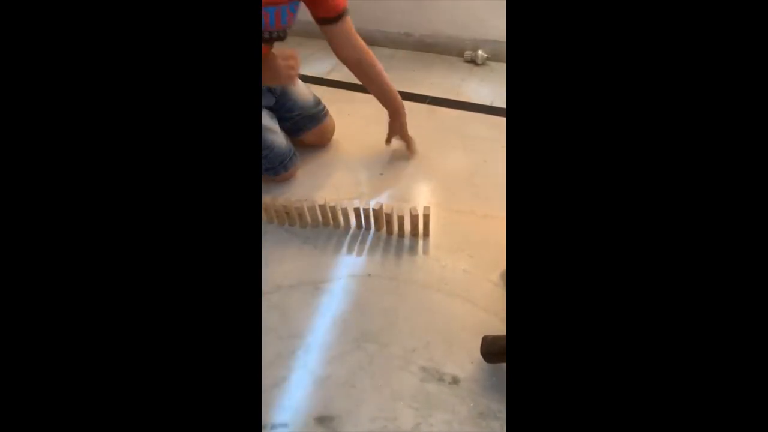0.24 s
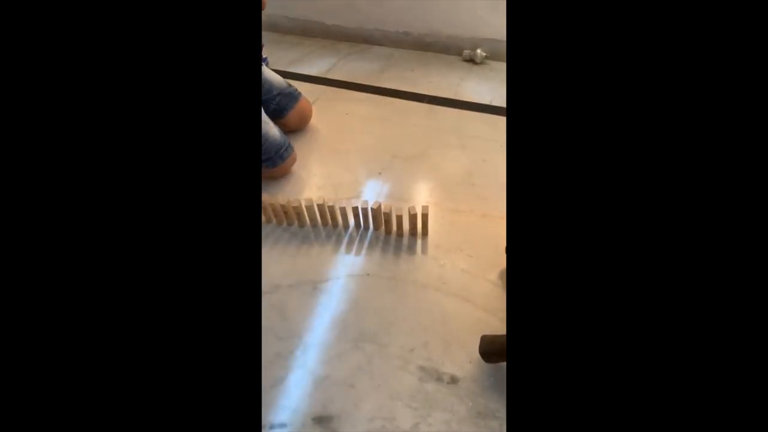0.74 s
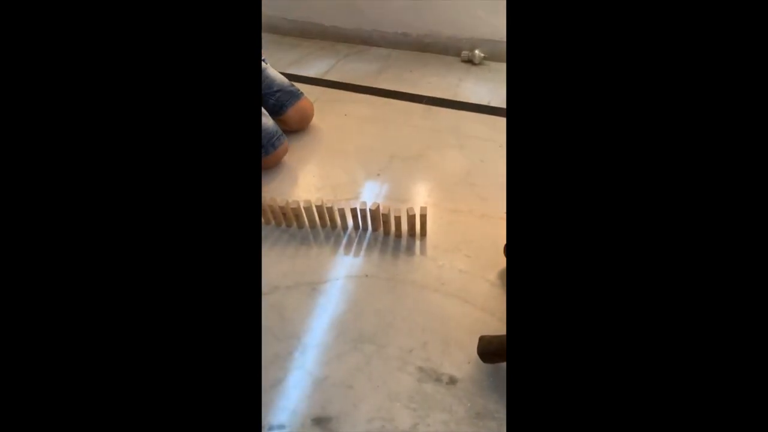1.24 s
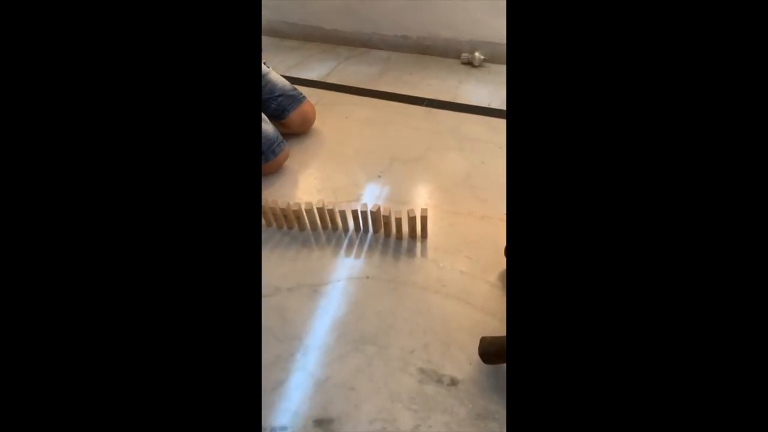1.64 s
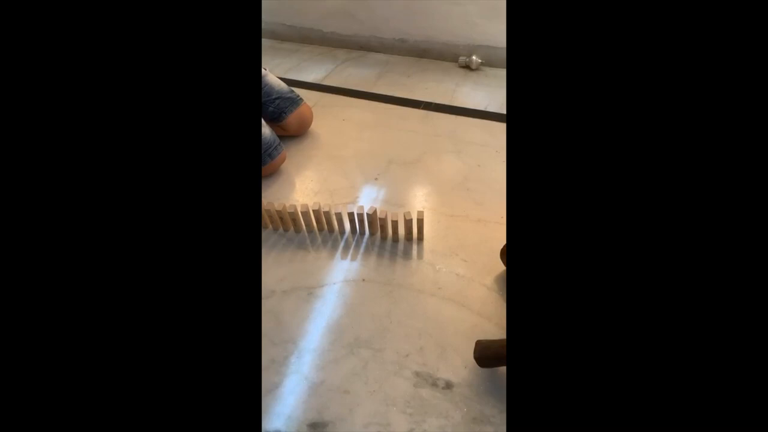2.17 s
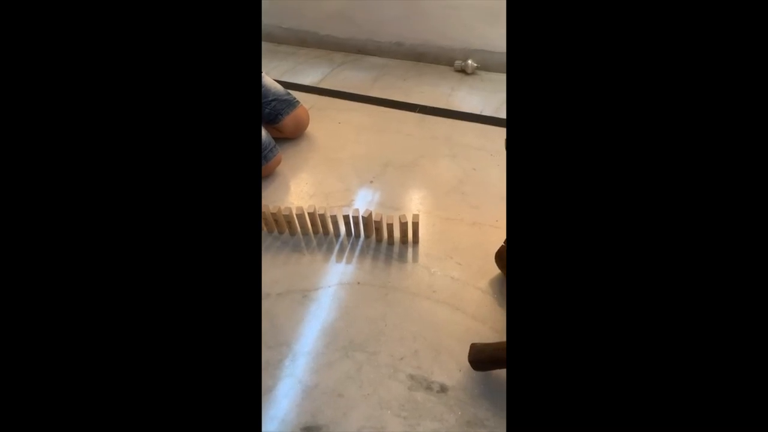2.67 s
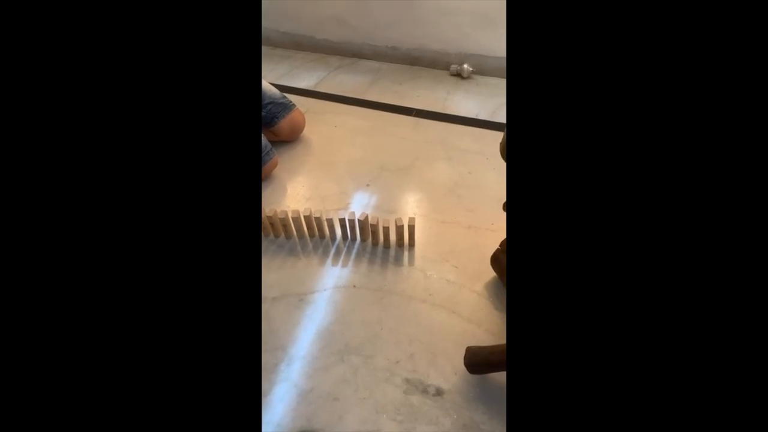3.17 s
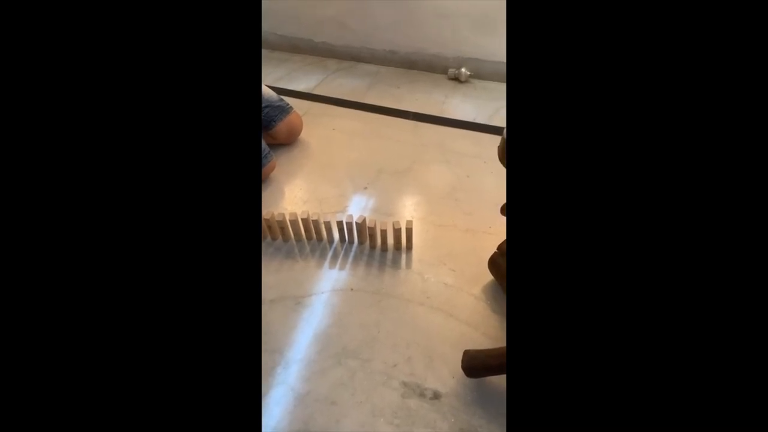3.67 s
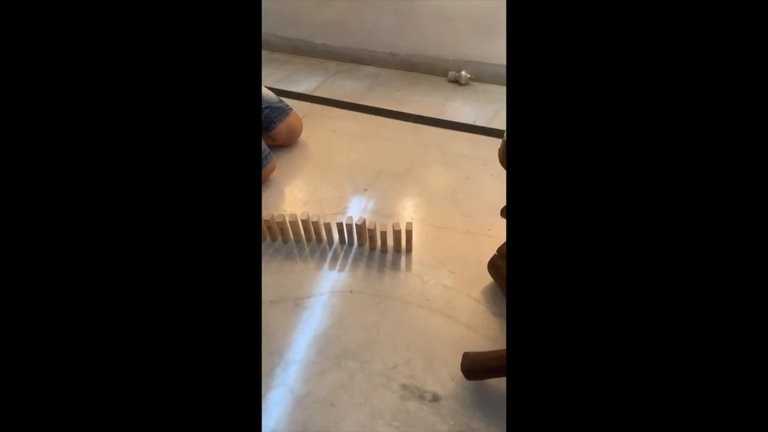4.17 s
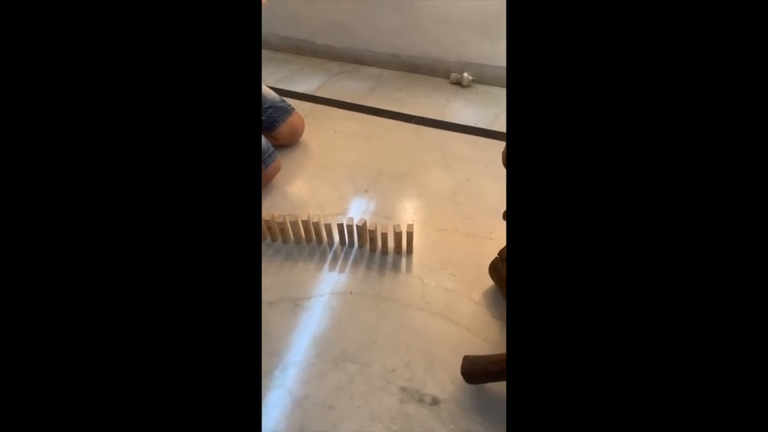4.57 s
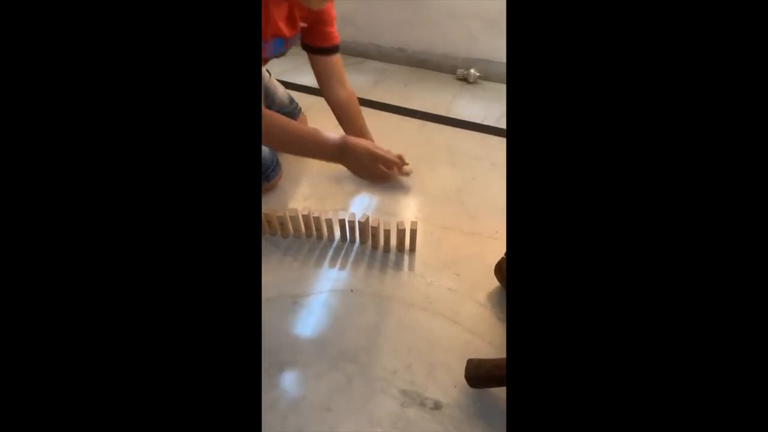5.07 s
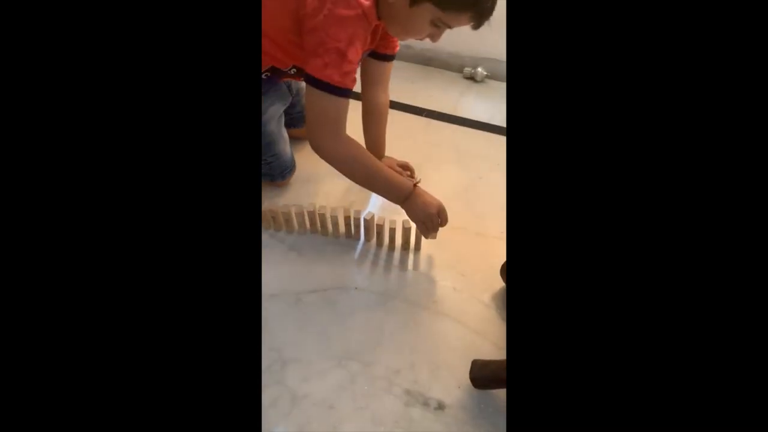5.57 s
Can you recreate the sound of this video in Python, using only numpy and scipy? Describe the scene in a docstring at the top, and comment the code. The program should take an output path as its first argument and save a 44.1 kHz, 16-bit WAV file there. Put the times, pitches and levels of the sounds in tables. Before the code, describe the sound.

Wooden blocks rummaged and knocked about in a hollow wooden box in a bare, ringing room, then one sharp block click nearby.

```python
"""Wooden blocks in a box

Wooden blocks tumble and knock in a hollow wooden box on a stone floor in a bare, ringing room.
Knocks and clicks are decaying sine waves plus noise bursts; lighter contacts form a random rattle.
Knees thump the floor as low sine pulses; slides, cloth and room tone are shaped noise.
Two microphone ports a few centimetres apart hear the hits from one side."""
import sys
import numpy as np
from scipy import signal
from scipy.fft import rfft, irfft, next_fast_len
from scipy.io import wavfile
from scipy.ndimage import uniform_filter1d

SR = 44100
rng = np.random.default_rng(int(sys.argv[2]) if len(sys.argv) > 2 else 0)


def unload_wav(signal):
    """Save mono or channel-first audio to the path in sys.argv[1] as 16-bit WAV at rate SR, clipped to [-1, 1]."""
    wavfile.write(
        sys.argv[1],
        SR,
        np.round(np.clip(np.atleast_2d(signal).T, -1, 1) * 32767).astype(np.int16),
    )


N = 256695

# Knocks in the box: t/s, side panels level/dB, then against the side panels: hollow level/dB,
# low panels level/dB, block bodies level/dB, crack level/dB; favoured side panel f/Hz, favoured block f/Hz
KNOCKS = [(0.803, -48.5, 7.5, 7, -6, 2.5, 870, 1120), (0.815, -47, -2, 8.5, -16, -3.5, 940, 1140),
          (0.843, -61, 15, 5, 2, -17, 767, 1980), (0.869, -33.5, -6.5, 4.5, 0.5, -7, 680, 1784),
          (0.9, -43.5, 3, -5, -22, -33, 556, 1760), (1.035, -46, -0.5, -8, -5, -3, 590, 1580),
          (1.118, -50.5, -16, -10, -18, -30, 724, 1570), (1.196, -53.5, 2, -12, -5, -22, 680, 984),
          (1.247, -60.5, 4.5, -8, -3, 5, 760, 2230), (1.545, -55.5, 2, -15, -6, -3.5, 825, 1940),
          (1.696, -47.5, -1, 2, -23, -15, 855, 1580), (1.725, -40, -17, -7, 4.5, -7, 660, 1610),
          (1.733, -29, -2.5, -3.5, -9, -16, 746, 1250), (1.761, -32.5, -11.5, -16, -2, -18, 790, 1570),
          (1.848, -31.5, -25, -16, 2, -15, 760, 1385), (1.908, -47, -15, 1, -5, -37, 695, 1690),
          (1.931, -31, -10, -6, -5, -21, 860, 1080), (1.963, -25, -12, -7, -0.5, -7.5, 675, 1273),
          (2.012, -21.5, -14.5, -4.5, -14, -12, 750, 1320), (2.035, -24, -7, 2.5, -6.5, -10.5, 596, 1630),
          (2.06, -37.5, -27, -5, -10, -9, 766, 1250), (2.093, -22.5, -24.5, -12.5, -7.5, -16, 860, 1050),
          (2.141, -44, 5.5, 11, -12, -9.5, 778, 1340), (2.197, -30, -3, -3, 4.5, -2.5, 494, 1290),
          (2.208, -23.5, -9, -1, -2, -5.5, 767, 1310), (2.265, -34, -23, -16.5, 8.5, -28, 764, 1520),
          (2.357, -29, -9.5, -10.5, -7.5, -13.5, 674, 1310), (2.363, -29.5, -9.5, -0.5, 0.5, -4, 770, 1640),
          (2.404, -30, -19, -7, -19.5, -8, 765, 1793), (2.413, -26, -22, -10, 1, 2.5, 737, 1080),
          (2.432, -29, -5.5, 4, 9, -11, 780, 1580), (2.445, -32.5, 6.5, 3, -11, -7, 790, 1550),
          (2.497, -30, -5.5, 5.5, -10.5, -13, 740, 1580), (2.546, -36.5, -0.5, 6.5, -6, -26.5, 794, 1550),
          (2.67, -35, 2.5, 3, -3, -5.5, 670, 1030), (2.737, -37.5, -1.5, 3.5, -6.5, -13.5, 516, 1370),
          (2.753, -31, 0, -2, 4, -9, 840, 1525), (2.809, -49, -7, -6, -7.5, -27.5, 600, 1650),
          (2.899, -31.5, -9, -3.5, -5, -6, 640, 1080), (2.984, -30.5, 0, -4.5, -8, -10, 770, 1530),
          (3.0069, -9.5, -2, 1.5, -2.5, -10, 703, 1364), (3.03, -20.5, -4, -1, -1.5, -15.5, 806, 1560),
          (3.058, -28.5, 3.5, 6, -0.5, -12, 790, 1280), (3.109, -24.5, -2, 1, 0.5, -20, 617, 1210),
          (3.133, -26.5, -6.5, 1.5, -3, -16.5, 477, 1300), (3.168, -29.5, 0.5, -3, 4, -9, 550, 1270),
          (3.371, -54, -9.5, -16.5, 13, 3, 800, 1680), (3.416, -43.5, -1.5, 1, -11.5, -7, 790, 1300),
          (3.446, -47, -6, -7.5, -11.5, -23, 634, 1530), (3.554, -42, -4, 1.5, -13.5, -21.5, 595, 1310),
          (3.578, -47, -1.5, 1, -7, -12, 630, 1630), (3.636, -34, -14.5, 0, 3, -9, 660, 2160),
          (3.651, -12.5, -5, 1, -3, -6, 603, 1390), (3.677, -24, -3.5, 0, -6.5, -17, 706, 1980),
          (3.697, -26.5, -6, -6.5, 3, -13.5, 656, 1583), (3.73, -24, -21.5, -18.5, -26, -26.5, 676, 1670),
          (3.792, -33.5, -9.5, -1, 5, -9, 695, 1310), (3.85, -47, -6, -0.5, 7.5, -1, 590, 1110),
          (3.909, -45.5, 2.5, 0, 1, -9, 628, 1287), (5.398, -60, -6, -2.5, -6, -12, 560, 1100)]
# What rings in the box, each: f/Hz, level/dB, time to fall 60 dB t60/s
HOLLOW_AIR = [(197.2, -23, 0.037), (230, -13, 0.13), (244, -9.5, 0.28), (263.5, -10.5, 0.3),
              (260, -5, 0.036)]
LOW_PANELS = [(338, -3, 0.031), (384.5, 7, 0.025), (420, -6.5, 0.02), (480, -3.5, 0.0065)]
SIDE_PANELS = [(562, -10.5, 0.05), (639, -15, 0.08), (635, 13, 0.014), (778.6, 0.5, 0.041),
               (849.3, 2.5, 0.033), (942, 3, 0.025)]
BLOCK_BODIES = [(1039, -5.5, 0.04), (1199, -1.5, 0.027), (1295, -2, 0.025), (1490, 2, 0.011),
                (1580, -1, 0.03), (1729, 0, 0.025), (2026, 7.5, 0.017), (2286, -10.5, 0.03),
                (2530, -8.5, 0.019), (3237, 3.5, 0.0095)]
# The struck piece rings at its own pitch, each: level/dB, t60/s
OWN_PANEL = (9.2, 0.012)
OWN_BLOCK = (6, 0.024)
# Colour of a knock's crack, and of sharp edges and fine hiss, each: f/Hz, level/dB
CRACK_COLOUR = [(1500, -24), (2000, -4.5), (2400, 9), (2900, 5.5), (3200, 5.5), (3500, 0), (4200, -4),
                (5500, -12), (6600, -9), (7200, -42.5)]
EDGE_COLOUR = [(7000, -11.5), (7800, -12.5), (9000, -11.5), (10300, -11), (10800, -7.5), (11100, -36),
               (11600, -52)]
# Small blocks jostle: t/s, level/dB, sharp edge level/dB
RATTLE_LEVELS = [(1.7, -58.5, -59.5), (1.92, -50, -89), (2.02, -38.5, -52.5), (2.19, -45, -59.5),
                 (2.33, -60.5, -104), (2.42, -42.5, -47), (2.6, -47.5, -90), (2.95, -51.5, -66),
                 (3.3, -56.5, -95.5), (3.418, -59.5, -99), (3.53, -87, -110), (3.641, -46.5, -77),
                 (4.0, -64.5, -111)]
# Body colour of a light contact: f/Hz, level/dB
JOSTLE_COLOUR = [(400, -21.5), (600, 7.5), (800, 3.5), (1050, -4), (1400, -3.5), (1900, -2), (2400, -35.5)]
# One block clicks on another: t/s, edge level/dB, then against the edge: body level/dB,
# crack level/dB; t60/s of the edge
CLICKS = [(0.187, -54, -26, 5, 0.057), (0.726, -45.5, -28, -7, 0.46), (0.747, -37.5, -30, -36, 0.088),
          (0.873, -43.5, 7, 12.5, 0.028), (1.173, -57.5, -31, 10, 0.039), (1.191, -49, -9, -6, 0.014),
          (4.382, -49.5, -9.5, -4, 0.015), (5.138, -36.5, 0.5, 9.5, .03), (5.143, -28, 5, 8, .04),
          (5.1496, -10, -7.5, 3, 0.021), (5.154, -18, -5.5, -5.5, 0.01), (5.6189, -65.5, 16, 12, 0.021)]
# Body ring of a click: f/Hz, level/dB, t60/s
CLICK_BODY = [(673, -10.5, 0.03), (1300, 2.5, 0.014), (1510, -7.5, 0.024), (1793, 2, 0.049),
              (1633, -4, 0.03), (2115, 0.5, 0.026), (3204, 2, 0.027)]
# Colour of a click's bright snap and of its crack, each: f/Hz, level/dB
SNAP_COLOUR = [(7000, -33.5), (7900, -1.5), (8800, -2), (9900, 7), (10600, -6.5), (11200, -15),
               (12000, -28.5)]
CLICK_CRACK_COLOUR = [(1500, -27.5), (2200, -0.5), (2600, 2.5), (3100, 1.5), (4000, 5), (4800, 6.5),
                      (6000, 2.5), (6600, -0.5), (7200, -37.5)]
# Rough rings after a click: f/Hz, width f/Hz, level/dB against the click's body, t60/s
AFTER_RINGS = [(1750, 540, -13.0, 0.2), (1676, 260, -28.5, 0.81)]
# Skin or cloth sliding on stone: start t/s, length t/s, level/dB, f/Hz, width f/Hz
SLIDES = [(0.551, 0.28, -62.5, 1150, 400), (0.647, 0.15, -64, 1710, 800), (1.244, 0.14, -65, 2250, 200)]
# Knees and feet shift on the floor, heavy knocks shake it: t/s, level/dB, f/Hz
THUMPS = [(0.195, -57, 102), (0.347, -56, 80), (0.818, -50, 96.5), (0.872, -46.5, 109), (1.107, -55.5, 124),
          (1.332, -51, 64.6), (1.543, -51.5, 58.5), (1.724, -43, 81), (2.002, -45, 116), (2.396, -44, 143),
          (3.006, -69, 132), (3.648, -47.5, 123), (4.155, -68.5, 100.4), (4.653, -44.5, 85.2),
          (4.694, -40.5, 68.6), (4.75, -42.5, 66), (4.799, -53, 76), (4.874, -51.5, 60),
          (4.978, -51.5, 61.7), (5.112, -58.5, 55.5), (5.177, -48.5, 51), (5.222, -59, 58.7),
          (5.548, -56, 66.2)]
# Cloth and skin, before and after the rummaging:
# t/s, low swish level/dB, thin rustle level/dB, fine hiss level/dB
RUSTLE_LEVELS = [
    [(0, -65.5, -74, -70), (.17, -78, -75.5, -78), (.5, -73, -66.5, -80), (.72, -66, -62.5, -68),
     (.9, -50.5, -75, -68), (1.15, -67, -68, -71.5), (1.43, -59.5, -69.5, -82), (1.57, -68, -85, -74),
     (1.72, -56, -57, -63)],
    [(3.95, -59.5, -64, -83), (4.32, -76.5, -74, -84), (4.62, -76, -81.5, -84), (4.78, -67.5, -63, -77),
     (4.98, -95, -63, -71), (5.25, -91.5, -61.5, -67), (5.42, -61, -63, -73), (5.58, -68.5, -75.5, -83.5),
     (5.82, -80.5, -86, -89)],
]
# Colour of the low swish and of the thin rustle, each: f/Hz, level/dB
SWISH_COLOUR = [(400, 2), (800, 4), (1200, -2.5), (2200, -2), (2800, -12.5), (4000, -48)]
CLOTH_COLOUR = [(2200, -5.5), (3000, -3), (3500, 2), (4000, -4), (4600, -20.5), (6300, -18.5),
                (7200, -30.5)]
# Colour of the room tone: f/Hz, level/dB per Hz
TONE_COLOUR = [(12, -44), (20, -18.5), (43, -2), (99, -2), (182, -9.5), (213, -11.5), (570, -20),
               (651, -20.5), (1990, -30.5), (2150, -37.5), (2590, -26.5), (3570, -43), (7130, -52),
               (10100, -39), (11500, -53), (15000, -82), (22000, -120)]
# How fast the room's echoes die: f/Hz, t60/s
ROOM_T60 = [(150, 0.65), (300, 0.28), (800, 0.5), (1200, 0.62), (1650, 0.28), (2200, 0.43), (4000, 0.43),
            (6000, 0.33), (10000, 0.27)]
# Room against direct sound: f/Hz, level/dB
ROOM_LEVEL = [(200, 6.5), (350, -2), (500, -4.5), (900, -4), (1500, 0), (2200, 0.5), (4000, 1), (7000, 2),
              (10400, 0.5), (10900, -35)]
# Likeness of the two ports in scattered sound: f/Hz, likeness from 0 to 1
PORT_LIKENESS = [(30, 0.48), (120, 1), (300, 0.63), (700, 0.12), (2000, 0.025), (5000, 0.45), (7500, 0.75),
                 (9000, 0.21)]
# The small box gives off little bass: f/Hz, level/dB
BASS_CUT = [(40, -6.5), (110, -2.5), (170, -13), (215, -1)]
# The topmost treble of the far box does not carry: f/Hz, level/dB
DISTANCE_COLOUR = [(2000, 3.5), (10800, -0.5), (11200, -22)]
# Colour difference of the ports: f/Hz, left minus right level/dB
PORT_BALANCE = [(60, 0), (140, -1.5), (350, -2.5), (830, 1.5), (1990, 0), (4770, -1), (11400, 0)]

# contact time of a knock at 0 dB, and how much longer it rests for each dB softer
CONTACT_S, LONGER_S_PER_DB = 0.00285, 0.00041059
CRACK_BUMPS_DB = 3.0  # every knock's crack has its own bumps of colour
WAVER_PER_S = 10  # shifting blocks load the box and bend its pitch about this often
EDGE_DB, EDGE_PER_CRACK_DB = 13, 1.68  # the louder the crack, the faster its sharp edge grows
SHAKEN_DB, SETTLE_S = -11.5, 0.12  # fizz after a sharp knock: dB against its edge, t60 in s
RATTLES_PER_S = 130  # average rate of small contacts
TONE_DB = -60.5
BOX_LEAD_S, CLICK_LEAD_S = 0.00022, 0.0001  # sound reaches the left port first
TOP_HZ = 12000  # upper band limit


def box():
    """Each knock shakes hollow, panels and blocks by its own shares; soft contacts swell slowly."""
    out = np.zeros(N)
    for s, side_db, hollow_db, low_db, body_db, crack_db, side_hz, body_hz in KNOCKS:
        contact_s = CONTACT_S - LONGER_S_PER_DB * side_db
        hollow = ringing(HOLLOW_AIR, 0.22 * contact_s, spread=0.011, waver=0.022)
        low = ringing(LOW_PANELS, 0.94 * contact_s, spread=0.022)
        side_modes = favouring(SIDE_PANELS, side_hz, 36.0, OWN_PANEL)
        side = ringing(side_modes, 0.44 * contact_s)
        body_modes = favouring(BLOCK_BODIES, body_hz, 17.0, OWN_BLOCK)
        body = ringing(body_modes, 0.4 * contact_s, spread=0.025)
        crack = burst(CRACK_COLOUR, 2.8 * contact_s, 0.032, CRACK_BUMPS_DB)
        edge = burst(EDGE_COLOUR, 1.8 * contact_s, 0.033)
        add(out, s, gain_of(side_db + hollow_db) * hollow)
        add(out, s, gain_of(side_db + low_db) * low)
        add(out, s, gain_of(side_db) * side)
        add(out, s, gain_of(side_db + body_db) * body)
        add(out, s, gain_of(side_db + crack_db) * crack)
        add(out, s, gain_of(edge_of(side_db, crack_db)) * edge)
    return out


def favouring(modes, hz, octave_db, own):
    """The struck piece's own ring comes first; rings far from its pitch are stirred less."""
    stirred = [(f, db - octave_db * np.log2(f / hz) ** 2, t60) for f, db, t60 in modes]
    return [(hz, *own)] + stirred


def edge_of(side_db, crack_db):
    """The sharp edge of a knock, in dB, grows with the level of its crack."""
    return EDGE_DB + EDGE_PER_CRACK_DB * (side_db + crack_db)


def rattle():
    """Many small random contacts, a few of them larger; sharp knocks set off more fizz."""
    s, db, edge_db = np.transpose(RATTLE_LEVELS)
    t = np.arange(N) / SR
    happens = rng.random(N) < RATTLES_PER_S / SR
    size = gain_of(3.1 * np.minimum(rng.exponential(1, N), 4)) * happens
    body = signal.oaconvolve(size, burst(JOSTLE_COLOUR, 0.0019, 0.049))[:N]
    crack = signal.oaconvolve(size, burst(CRACK_COLOUR, 0.0001, 0.02))[:N]
    edge = signal.oaconvolve(size, burst(EDGE_COLOUR, 0.0001, 0.02))[:N]
    shaken = gain_of(np.interp(t, s, edge_db, -120, -120))
    for start, side_db, _, _, _, crack_db, _, _ in KNOCKS:
        fizz_db = edge_of(side_db, crack_db) + SHAKEN_DB - 60 * t[:SR // 2] / SETTLE_S
        add(shaken, start, gain_of(fizz_db))
    level = gain_of(np.interp(t, s, db, -120, -120))
    return level * evened(body + gain_of(-9.0) * crack) + shaken * evened(edge)


def clicks():
    """Small hard blocks: a short body ring under a bright snap, then rough after-rings."""
    out, t = np.zeros(N), np.arange(SR // 2) / SR
    for s, edge_db, body_db, crack_db, t60 in CLICKS:
        add(out, s, gain_of(edge_db) * burst(SNAP_COLOUR, 0.00034, t60))
        add(out, s, gain_of(edge_db + crack_db) * burst(CLICK_CRACK_COLOUR, 0.0014, 1.4 * t60))
        add(out, s, gain_of(edge_db + body_db) * ringing(CLICK_BODY, 0.0009, spread=0.016))
        for hz, width_hz, ring_db, ring_t60 in AFTER_RINGS:
            rough = evened(narrow_noise(hz, width_hz)) * (1 - np.exp(-t / 0.0045))
            fading_db = edge_db + body_db + ring_db - 60 * t / ring_t60
            add(out, s, gain_of(fading_db) * rough)
    return out


def slides():
    """Skin or cloth on stone: each slide is noise in one narrow band that swells and fades."""
    out = np.zeros(N)
    for s, length, db, hz, width_hz in SLIDES:
        t = np.arange(0, length, 1 / SR)
        hiss = evened(narrow_noise(hz, width_hz)[:len(t)])
        add(out, s, gain_of(db) * np.sin(np.pi * t / length) * hiss)
    return out


def thumps():
    """Soft weight on the slab: a few low cycles, reaching the ports by two paths."""
    out, t = np.zeros(N), np.arange(SR // 5) / SR
    for s, db, hz in THUMPS:
        swell = t / 0.01 * np.exp(1 - t / 0.012)
        add(out, s, gain_of(db) * np.sin(2 * np.pi * hz * t) * swell)
    return ports(out, np.roll(out, 160))  # the second path is 160 samples later


def rustle():
    """Cloth drags: bands of noise that flicker as the folds slip."""
    t, out = np.arange(N) / SR, np.zeros((2, N))
    before, after = RUSTLE_LEVELS
    s, *levels_db = np.transpose(np.concatenate([before, after]))
    idle = (t > before[-1][0]) & (t < after[0][0])
    for db, colour in zip(levels_db, (SWISH_COLOUR, CLOTH_COLOUR, EDGE_COLOUR)):
        a, b, slips = rng.standard_normal((3, N))
        flicker_db = 1.8 * evened(uniform_filter1d(uniform_filter1d(slips, 900), 900))
        band = evened(coloured(ports(a, b), colour))
        out += band * gain_of(np.interp(t, s, db) + flicker_db)
    return out * uniform_filter1d(1. - idle, 2000)  # silent in between, with soft joins


def room_tone():
    """Steady distant rumble and air: noise with a fixed colour."""
    noise = ports(*rng.standard_normal((2, N)))
    return gain_of(TONE_DB) * evened(coloured(noise, TONE_COLOUR))


def room(x):
    """Sparse reflections, each band dying at its own speed; three tails take turns so hits differ."""
    t, out = np.arange(N) / SR, np.zeros((2, N))
    for k in range(3):
        # one reflection of random sign at a random spot in every 20 samples
        taps = np.zeros((2, SR))
        at = np.arange(260, SR - 20, 20) + rng.integers(0, 20, (2, (SR - 261) // 20))
        np.put_along_axis(taps, at, rng.choice([-1., 1.], at.shape), 1)
        hz, frame_s, bands = signal.stft(ports(*taps), SR, nperseg=256)
        t60 = read(ROOM_T60, hz)[:, None]
        fading_db = read(ROOM_LEVEL, hz)[:, None] - 60 * frame_s / t60
        bands = bands * gain_of(fading_db) / np.sqrt(t60)
        # even out the total energy of the reflections
        tail = signal.istft(bands, SR, nperseg=256)[1] / np.sqrt(SR / 20 / (2 * np.log(1000)))
        turn = np.sqrt(2 / 3) * np.cos(2 * np.pi * (1.3 * t + k / 3))
        out += signal.fftconvolve((x * turn)[None], tail, axes=1)[:, :N]
    return out


def ringing(modes, contact_s, spread=0.014, waver=0):
    """Rings struck at a random spot swell while the contact lasts, perhaps wavering; peak 1."""
    hz, db, t60 = np.transpose(modes)[:, :, None]
    t = np.arange(round(t60.max() * SR)) / SR
    spot, detune, pace, start = rng.standard_normal((4, len(modes), 1))
    db = db + 2.0 * spot
    hz = hz * (1 + spread * detune)
    turn = 2 * np.pi * WAVER_PER_S * np.exp(pace / 2)
    # running time slightly fast and slow bends the pitch
    bent = t + waver * (np.sin(turn * t + 2 * start) - np.sin(2 * start)) / turn
    x = (gain_of(db - 60 * t / t60) * np.sin(2 * np.pi * hz * bent)).sum(0)
    x = x * (1 - np.exp(-(t / contact_s) ** 2))
    return x / abs(x).max()


def burst(points, rise_s, t60, bumps_db=0):
    """A ragged puff of tiny contacts, its spectrum even or randomly bumpy; peak 1."""
    t, hz = np.arange(4096) / SR, np.fft.rfftfreq(4096, 1 / SR)
    noise, bumps = rng.standard_normal((2, len(t)))
    bumps = evened(uniform_filter1d(uniform_filter1d(bumps, size=40), size=40))[:len(hz)]
    shape = (1 - np.exp(-t / rise_s)) * gain_of(-60 * t / t60)
    colour = gain_of(read(points, hz) + bumps_db * bumps)
    x = noise * shape
    for _ in range(3):  # alternate between the wanted colour and the wanted envelope
        x = irfft(colour * np.exp(1j * np.angle(rfft(x))))
        x = x / np.sqrt(abs(uniform_filter1d(x ** 2, size=64)) + 1e-20) * shape
    return x / abs(x).max()


def narrow_noise(hz, width_hz):
    """Half a second of noise, keeping only a band around one pitch."""
    edges = [hz - width_hz / 2, hz + width_hz / 2]
    band = signal.butter(2, edges, "bandpass", fs=SR, output="sos")
    return signal.sosfilt(band, rng.standard_normal(SR // 2))


def ports(a, b=0, lead_s=BOX_LEAD_S):
    """Makes a port pair: the left one leads; a second signal makes them unlike by PORT_LIKENESS."""
    n = next_fast_len(len(a))
    hz = np.fft.rfftfreq(n, 1 / SR)
    same = np.clip(read(PORT_LIKENESS, hz), 0, 1) if np.ndim(b) else 1
    left = same * rfft(a, n) + np.sqrt(1 - same ** 2) * rfft(b + 0 * a, n)
    earlier = np.exp(2j * np.pi * hz * lead_s)
    return np.array([irfft(left * earlier, n)[:len(a)], a])


def coloured(x, points):
    """Makes each pitch range louder or softer by a spectrum given in dB."""
    length = x.shape[-1]
    n = next_fast_len(length)
    gain = gain_of(read(points, np.fft.rfftfreq(n, 1 / SR)))
    return irfft(rfft(x, n) * gain, n)[..., :length]


def read(points, hz):
    """Reads a table between its points, along a logarithmic pitch scale."""
    f, value = np.transpose(points)
    return np.interp(np.log(hz + 1), np.log(f + 1), value)


def gain_of(db):
    """Turns dB into a plain multiplier."""
    return 10 ** (np.asarray(db) / 20)


def evened(x):
    """Scales a signal to an average (RMS) strength of 1."""
    return x / np.sqrt(np.mean(x ** 2) + 1e-20)


def add(mix, s, sound):
    """Adds a sound to the mix from time s in seconds, cut off at the end of the mix."""
    part = mix[round(s * SR):][:len(sound)]
    part += sound[:len(part)]


def scene():
    """Hits arrive directly and through the room, over the background; clicks are nearer and drier."""
    far = coloured(box() + gain_of(-1.5) * rattle(), BASS_CUT + DISTANCE_COLOUR)
    near = coloured(clicks(), BASS_CUT)
    direct = ports(far) + ports(near + slides(), lead_s=CLICK_LEAD_S)
    echoes = room(far + gain_of(-8.0) * near)
    return direct + echoes + thumps() + rustle() + room_tone()


def record(dry):
    """The ports differ a little in colour; then everything above the band limit is cut."""
    left = coloured(dry[0], [(f, db / 2) for f, db in PORT_BALANCE])
    right = coloured(dry[1], [(f, -db / 2) for f, db in PORT_BALANCE])
    low_pass = signal.firwin(511, TOP_HZ, window=("kaiser", 9), fs=SR)
    return signal.oaconvolve(np.array([left, right]), low_pass[None], "same")


dry = scene()
out = record(dry)
unload_wav(out)
```